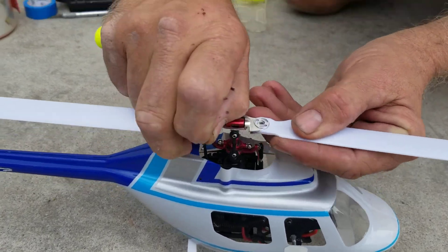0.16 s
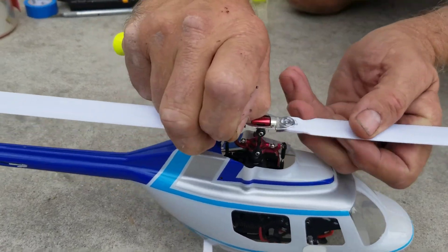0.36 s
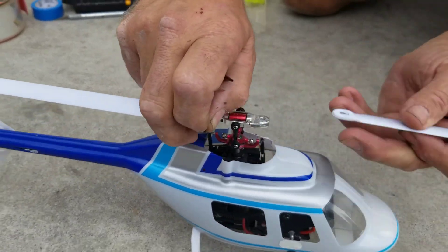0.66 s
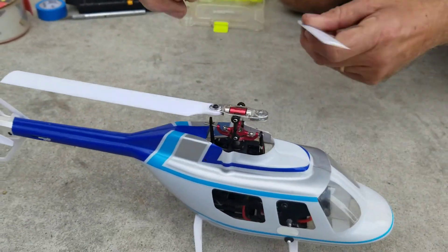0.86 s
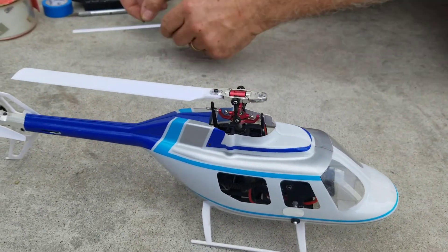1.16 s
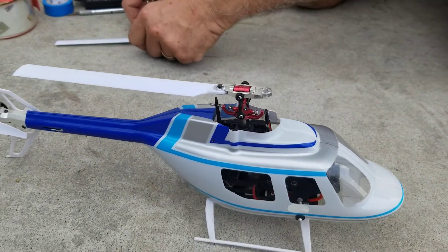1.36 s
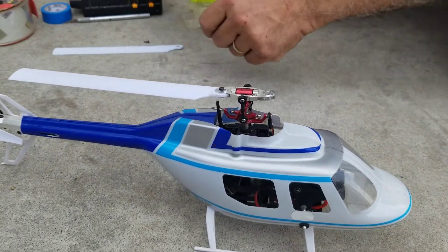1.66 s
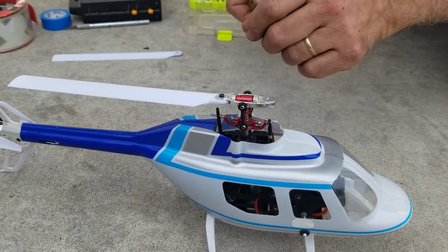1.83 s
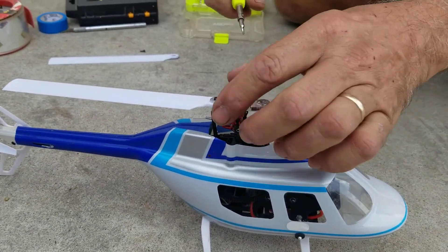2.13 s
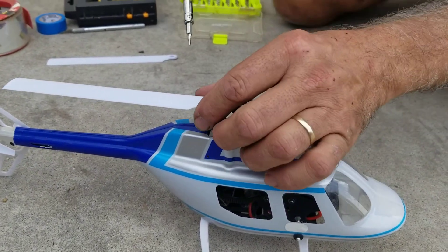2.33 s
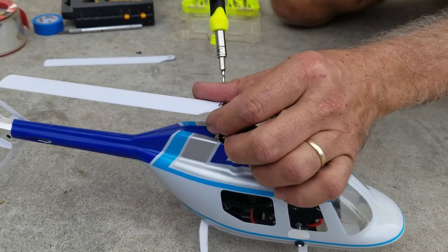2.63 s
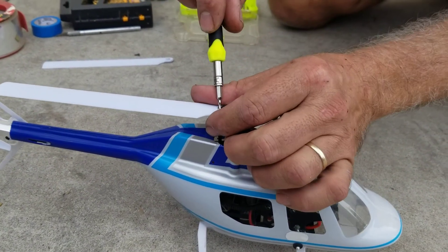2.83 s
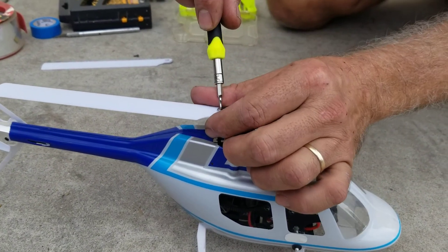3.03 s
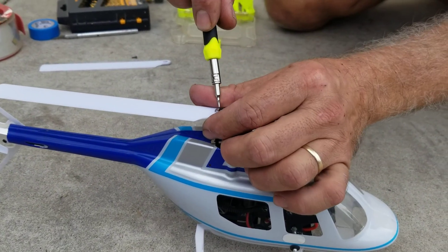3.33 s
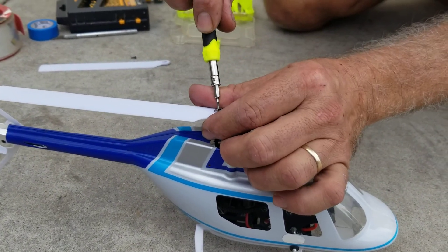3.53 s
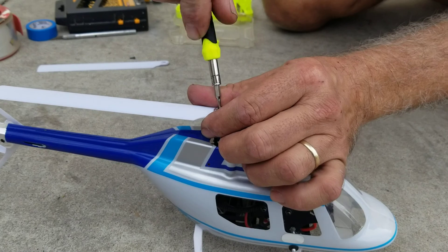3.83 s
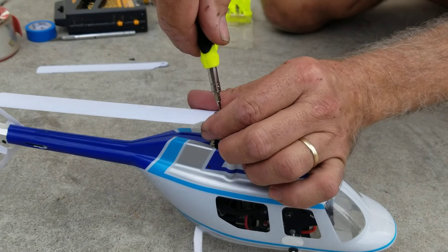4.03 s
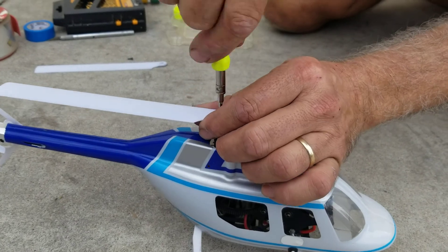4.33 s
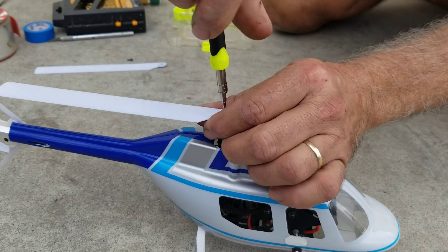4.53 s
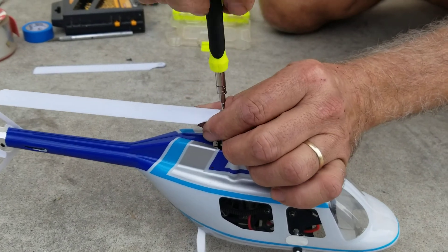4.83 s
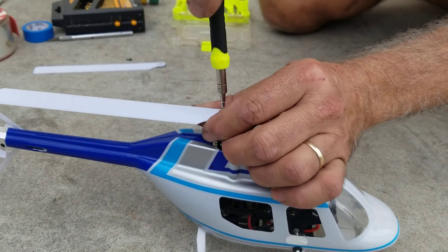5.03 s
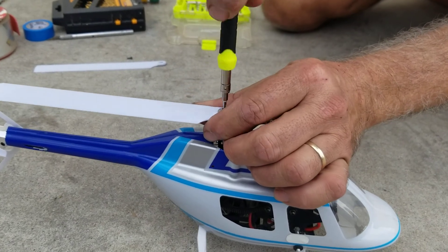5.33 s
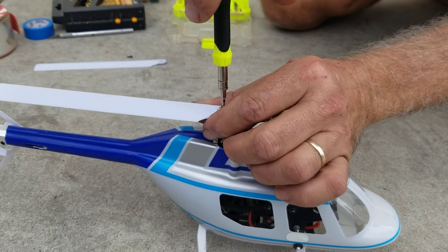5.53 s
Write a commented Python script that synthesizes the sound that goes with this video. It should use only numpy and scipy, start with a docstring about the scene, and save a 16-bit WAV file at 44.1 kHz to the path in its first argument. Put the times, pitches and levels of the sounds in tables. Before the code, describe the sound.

Close, light clicks, knocks and scrapes of a screwdriver and fingers on hollow plastic, with a low engine drone far off outdoors.

```python
"""Hands and a small screwdriver work on a plastic model helicopter, close to a phone's two microphone ports.
Ticks, knocks and scrapes ring the hollow cabin and shell, the metal hub and the screwdriver, and a short,
diffuse noisy tail follows each contact. Fingers creak and hiss on the plastic; a small metal part pings.
Far off, an engine drones and slows over outdoor rumble. A thin whistle comes and goes in the
background, and the microphone hisses steadily."""
import sys
import numpy as np
from scipy import signal
from scipy.fft import rfft, irfft
from scipy.io import wavfile
from scipy.ndimage import uniform_filter1d

SR = 44100
rng = np.random.default_rng(int(sys.argv[2]) if len(sys.argv) > 2 else 0)


def waveform_to_disk(signal):
    """Save audio, clipped to [-1, 1], as 16-bit WAV at the path in sys.argv[1]."""
    frames = np.transpose(np.atleast_2d(signal))
    scaled = np.clip(frames, -1, 1) * 32767
    samples = np.round(scaled).astype(np.int16)
    wavfile.write(sys.argv[1], SR, samples)


N = 250488

# microphone hiss, lifted by the resonance of its port: f/Hz, relative density/dB
HISS_SPECTRUM = [(1530, -47.5), (2600, -37.5), (5880, -32.5), (6390, -16), (7150, -27.5), (9380, -25),
                 (11000, -7), (11900, 2.5), (15800, -10)]
# outdoor background: f/Hz, relative density/dB
OUTDOOR_SPECTRUM = [(15, -72.5), (25, -26), (70, -12.5), (85, -13.5), (107, -9.5), (125, -11), (141, -20.5),
                    (220, -18.5), (435, -37.5), (461, -39), (680, -36), (1270, -51), (1540, -46.5),
                    (2600, -77.5), (3380, -112), (5720, -120)]
# its loudness: t/s, level/dB
OUTDOOR_LEVEL = [(0, -35), (1, -39.5), (2, -41.5), (3, -41), (4, -41), (5, -42.5), (5.68, -46)]
# far engine's fundamental: t/s, level/dB
ENGINE_LEVEL = [(0, -38.5), (.24, -25.5), (.75, -27.5), (1.35, -32), (1.72, -39.5), (2.12, -39.5),
                (2.4, -31), (2.75, -28.5), (3.2, -31.5), (3.37, -33), (3.5, -48.5), (3.76, -36),
                (4.2, -38.5), (4.55, -44), (5.43, -43.5), (5.58, -39), (5.68, -45)]
# its running: t/s, firing rate/Hz, flutter/dB
ENGINE_SPEED = [(0, 110, 1.2), (.15, 107.5, .8), (3.05, 107.5, .8), (3.3, 103, 1.8), (3.5, 90, 2.5),
                (4.4, 89, 3.5), (5.68, 89, 3.5)]
# thin whistle: t/s, level/dB
WHISTLE_LEVEL = [(0, -99), (2.12, -97.5), (2.2, -82), (2.3, -77), (2.58, -85), (2.68, -75), (2.95, -79),
                 (3.05, -104.5), (5.68, -99)]
# modes of the model and of the screwdriver's shaft and tip: f/Hz, width/Hz, relative level/dB
CABIN_MODES = [(456, 178, -5.5), (691, 120, 2), (945, 123, 1.5), (1174, 215, -2)]
SHELL_MODES = [(1603, 310, -1.5), (1831, 305, 0.5), (2041, 326, -1.5), (2274, 273, -5)]
HUB_MODES = [(2960, 610, -2), (3610, 900, 1), (4290, 840, 2), (4773, 850, 0.5), (5660, 900, -8)]
SHAFT_MODES = [(6660, 1070, -4.5), (7910, 640, 1.5), (8730, 800, 1), (9860, 570, 1.6)]
TIP_MODES = [(12380, 2350, 0.5), (13300, 1300, -9), (14260, 790, -3), (14300, 2400, -1)]
# fingers on the model: t/s, pressing creak/dB, sliding hiss/dB
FINGER_LEVELS = [(0, -56, -61.5), (.09, -58, -56), (.22, -65, -79), (.44, -59, -62), (.6, -61, -53),
                 (.76, -61, -63), (.88, -69.5, -67.5), (1.4, -67, -83), (1.8, -83, -77.5), (2.09, -75, -66),
                 (2.27, -67.5, -78.5), (2.42, -61.5, -68), (2.64, -71.5, -78.5), (3.11, -73, -78.5),
                 (3.45, -71, -99), (3.75, -62, -77), (4.4, -60.5, -73), (4.9, -65, -67.5), (5.27, -64, -71),
                 (5.4, -65.5, -74), (5.6, -65, -66.5)]
# soft scrapes, rms over 10 ms: t/s, body/dB, hub/dB, screwdriver/dB, tip over shaft/dB
SCRAPES = [(0.049, -59, -63, -60, 10.0), (0.229, -45.5, -48.5, -57, -2), (0.254, -51, -52.5, -58, -3),
           (0.355, -51, -58.5, -68.8, -0.9), (0.392, -50.5, -54.5, -65.0, -3.8),
           (0.445, -50, -59, -63.5, -14.0), (0.475, -68, -72, -65, -8), (0.522, -49, -51.5, -50, 2),
           (0.565, -69, -62, -65, 1.5), (0.595, -55, -61, -66, -0.7), (0.635, -49, -52.5, -63.4, -0.5),
           (0.665, -60, -63, -54.3, 4), (0.691, -44.5, -51.5, -61.5, -1.8), (0.755, -63, -71.7, -69.8, 5.7),
           (1.861, -67.5, -81.7, -66, 4.2), (1.904, -63, -61.5, -68.4, -5.1), (1.985, -70, -80.6, -64, 1.7),
           (2.02, -65, -71, -59, 1.3), (2.094, -72, -78, -65, -1.3), (2.318, -49.5, -59, -66, -7.1),
           (2.338, -45.5, -54, -65, -9), (2.415, -49.6, -59.2, -78, -2.0), (2.526, -55.3, -62.5, -75.1, -7),
           (3.088, -66, -69.0, -75.9, 0.2), (4.191, -45, -55.5, -64.7, 1), (4.22, -47, -53.5, -59.5, -3.3),
           (4.351, -62, -63, -60.5, 7), (4.544, -54, -60.2, -66.6, -6), (4.661, -70, -64, -53.5, 11),
           (4.815, -70, -82, -67, -11), (4.861, -78, -79, -59.5, 0.2), (4.907, -55, -58.5, -59.5, -0.3),
           (5.055, -52, -53, -68.4, -6.8), (5.095, -59.5, -74.3, -60.5, -2), (5.165, -66.5, -80, -66, 0.5),
           (5.269, -66, -66.8, -69, -2.9), (5.563, -75, -60.6, -66.7, 4.8)]
# sharp ticks and knocks, rms over 10 ms:
# t/s, cabin/dB, shell/dB, hub/dB, screwdriver/dB, tip over shaft/dB, left over right/dB
TICKS = [(0.031, -45, -47.5, -62, -74.7, 0.0, -8.0), (0.102, -31.5, -32.5, -39.5, -53.5, -3.5, -0.4),
         (0.172, -45.0, -50, -59.1, -78, -8.4, 1.0), (0.18, -46, -51, -46.5, -60, -2.3, -0.6),
         (0.201, -51, -45.5, -49.5, -51.5, 3, -4), (0.549, -48.5, -46.5, -51, -56, -2, -2),
         (1.007, -47, -56, -59.8, -65, -3.5, -2), (1.265, -62, -46.5, -46.5, -43, 1, -2),
         (1.293, -72, -54, -51, -51, -1, -1.1), (1.385, -49.5, -54.5, -48.0, -60, -4.1, 11),
         (1.402, -60, -51, -39.5, -36.5, -4.5, 1), (1.697, -67, -68, -64.1, -71.1, -1.8, -6.0),
         (1.722, -66, -71, -64, -72, -13.1, -2.8), (1.767, -71, -63.6, -54.5, -62.5, -6, -3.5),
         (1.89, -64, -61, -57, -59, -4, -3.1), (2.049, -62, -64, -59.0, -57, -7.8, -1.4),
         (2.073, -62, -57, -55.5, -56, -8, -4), (2.28, -60.0, -66, -61, -69, -6.0, -3),
         (2.291, -67.8, -57, -55.5, -67.5, -9, -2.5), (2.379, -58, -52.5, -57, -72, -7.3, -0.8),
         (2.45, -66.3, -57, -52, -63.5, -10, -1.4), (2.909, -57, -62.5, -69.5, -81, -0.8, -4.1),
         (2.999, -56, -64.5, -59, -52, -10.5, 0), (3.117, -57, -72, -72, -79, -8.6, -4),
         (3.485, -62, -65.1, -60.5, -64, -6.4, -3), (3.614, -64, -62.8, -68, -80.5, -6.7, -7),
         (3.636, -55, -57, -60.5, -69, -4.6, -1.8), (3.657, -53, -55, -61.6, -69, -2.6, -1.2),
         (3.677, -52, -58, -61, -75.3, -3.8, -1), (3.74, -69, -60, -67.4, -79.6, -7.5, -4.0),
         (3.81, -49.8, -54.5, -60, -66, 0, -4), (3.853, -51.0, -54, -63.3, -64, 5.1, -3),
         (3.881, -48.5, -57.8, -68, -68, -7.2, -2.5), (3.908, -38.5, -41.5, -36.5, -40, -1.5, -1.5),
         (4.059, -49.5, -56, -66, -52.5, 5, 0.7), (4.135, -65.8, -61, -74, -81.3, -1.7, -4.8),
         (4.245, -48, -50.5, -60, -68, -4.4, -1), (4.278, -52, -48, -56.5, -49, 2, 0.9),
         (4.592, -50, -50.5, -63.7, -63, -3.2, -4.2), (4.643, -58, -68, -78.4, -74.0, 10.0, -2),
         (4.721, -52.2, -56, -50, -44.7, 0.3, 0.1), (5.036, -48.5, -51.6, -44.8, -49, 5, -1),
         (5.045, -51, -50, -49, -45, 0, -2), (5.137, -69.8, -58, -61, -64, -2.4, -0.8),
         (5.153, -64.8, -59.1, -53.5, -62.9, -2, -3), (5.219, -58, -70, -61.5, -54, 2, 0.5),
         (5.325, -53.5, -54, -55.5, -45, 6, 1), (5.349, -70.3, -62.2, -58, -64, 5.9, -1.4),
         (5.378, -52.5, -48.5, -44.5, -40.2, -1.5, 0), (5.437, -70.7, -73, -56.4, -61.8, -7, 0),
         (5.538, -72.1, -73, -62.5, -54.5, -1.9, -1.4), (5.606, -61, -65, -54, -62.8, -14.0, -5),
         (5.626, -62, -55, -55.5, -51, -1.1, -1), (5.639, -52.5, -51.5, -54, -57.7, -2.9, 1),
         (5.669, -65, -58, -56, -61.2, -3.7, -1.4)]
TAIL_SEND_DB = [4.5, 5, 3, -2.5, 1.5]  # into the short tail: cabin, shell, hub, shaft, tip
SIDE = np.array([[1], [-1]])  # added at the left port, subtracted at the right

TAIL_T60_S, PORT_LAG_S = .12, .00007
FIRST_BLOW_DB, TOUCH_SPREAD_DB = 14, 1.8  # first impact over its rattle; scatter of mode levels


def undb(db):
    """Gain of a level in dB."""
    return 10 ** (np.asarray(db) / 20)


def level(x, db):
    """Scale to an rms level."""
    return x * undb(db) / np.sqrt(np.mean(x ** 2))


def curves(table):
    """Columns of a timed table, one value a sample."""
    times, *columns = np.transpose(table)
    return [np.interp(np.arange(N) / SR, times, column) for column in columns]


def walk(rate):
    """Random levels held 1 / rate s and smoothed twice; spread near 1."""
    hold = int(SR / rate)
    steps = np.repeat(rng.standard_normal(N // hold + 1), hold)
    return 1.354 * uniform_filter1d(uniform_filter1d(steps, hold), hold)[:N]


def noise_spectrum(points):
    """Spectra of two unrelated noises shaped by points of f/Hz, level/dB."""
    hz, db = np.transpose(points)
    gain = undb(np.interp(np.log(np.fft.rfftfreq(N, 1 / SR) + 1e-9), np.log(hz), db))
    return rfft(rng.standard_normal((2, N))) * gain


def response(modes, size, touch_db=0):
    """Spectrum of a sum of resonances of alternating sign, with mean power 1."""
    centre, width, db = np.transpose(modes)[:, :, None]
    hz = np.fft.rfftfreq(size, 1 / SR)
    sign = (-1.) ** np.arange(len(modes))[:, None]
    peaks = 1j * hz * width / (centre ** 2 - hz ** 2 + 1j * hz * width)
    gain = np.sum(sign * undb(db + touch_db) * peaks, axis=0)
    return gain / np.sqrt(np.mean(abs(gain) ** 2))


def ring(x, modes):
    """Pass a signal through resonances."""
    return irfft(rfft(x) * response(modes, N), N)


def microphone_hiss(top_hz=15800, db=-71.5):
    """The microphone's own noise, steady and unrelated at the two ports."""
    below = np.fft.rfftfreq(N, 1 / SR) < top_hz
    return level(irfft(noise_spectrum(HISS_SPECTRUM) * below, N), db)


def rumble(hz=48.4, width_hz=16, db=-57):
    """The deepest bass of the place, steady and nearly alike at both ports."""
    mid, side = ring(rng.standard_normal((2, N)), [(hz, width_hz, 0)])
    return level(mid + .2 * side * SIDE, db)


def outdoors():
    """Open air: octave noise bands that swell together and flicker alone, wider towards the treble."""
    out, swell = 0, walk(0.55)
    hz = np.fft.rfftfreq(N, 1 / SR) + 1e-9
    for centre in 50 * 2. ** np.arange(7):
        band = np.cos(np.pi / 2 * np.clip(np.log2(hz / centre), -1, 1))
        mid, side = irfft(noise_spectrum(OUTDOOR_SPECTRUM) * band, N)
        apart = np.clip((centre / 2500) ** 0.39, .2, 1)
        out = out + undb(0.25 * swell + 0.3 * walk(4.5)) * (mid + apart * side * SIDE)
    return level(out, curves(OUTDOOR_LEVEL)[0])


def far_engine(fade_db_per_s=5, slowing_db_per_hz=.35):
    """Three harmonics of a slightly uneven firing rate; the air on the way makes the level flutter."""
    hz, flutter_db = curves(ENGINE_SPEED)
    wobble = 0.0041 * flutter_db ** 1.585 * walk(20)
    phase = 2 * np.pi * np.cumsum(hz * (1 + wobble)) / SR
    # the overtones fade as the engine draws away and as it slows
    second_db = -40 - fade_db_per_s * np.arange(N) / SR - slowing_db_per_hz * np.maximum(105 - hz, 0)
    harmonics_db = curves(ENGINE_LEVEL)[0], second_db, second_db - 12
    return sum(np.sqrt(2) * undb(db + flutter_db * walk(18)) * np.sin(k * phase)
               for k, db in enumerate(harmonics_db, 1))


def whistle(hz=4150, width_hz=260):
    """A faint, thin whistle: noise passed twice through one narrow resonance."""
    mode = [(hz, width_hz, 0)]
    narrow = ring(ring(rng.standard_normal((2, N)), mode), mode)
    return level(narrow, curves(WHISTLE_LEVEL)[0])


def ping(start_s=.549, hz=4200, db=-49, t60_s=.17):
    """A small metal part rings once, a lone mode dying away."""
    t = np.arange(N) / SR - start_s
    return (t > 0) * undb(db - 60 * np.maximum(t, 0) / t60_s) * np.sin(2 * np.pi * hz * t)


def skin_slips(scatter_db, patchy_db):
    """Dense uneven slips of skin on plastic, swelling together at the two ports."""
    mid, side = rng.standard_normal((2, N))
    strength = undb(scatter_db * rng.standard_normal(N) + patchy_db * walk(90))
    return level(strength * (mid + 0.98 * side * SIDE), 0)


def fingers(slide_share=0.69, cabin_apart=.6):
    """Close up, pressing makes the body creak, sliding skin hisses, and the hub rasps with both."""
    creak_db, skin_db = curves(FINGER_LEVELS)
    rasp_db = creak_db + slide_share * (skin_db - creak_db) - 1
    creak = skin_slips(scatter_db=3.8, patchy_db=2.7)
    mid = creak.mean(axis=0)
    low_creak = mid + cabin_apart * (creak - mid)  # differs less between the ports
    body = ring(creak, SHELL_MODES) + undb(5) * ring(low_creak, CABIN_MODES)
    slide = skin_slips(scatter_db=4.5, patchy_db=2.34)
    skin = ring(slide, SHAFT_MODES) + undb(2) * ring(slide, TIP_MODES)
    return undb(creak_db) * body + undb(rasp_db) * ring(creak, HUB_MODES) + undb(skin_db) * skin


def short_tail(envelope, noise):
    """Spectrum of a short, diffuse tail: noise whose power follows the contact, then dies away."""
    decay = undb(-120 / TAIL_T60_S / SR)  # of power, each sample
    power = signal.lfilter([.02], [1, -decay], envelope ** 2)
    return rfft(noise * np.sqrt(power))


def contacts(table, decay_ms, tail_send_db, swell, apart):
    """Each contact is a run of tiny impacts that rings model and screwdriver; a noisy tail follows."""
    size, samples_10ms = 8192, SR / 100
    out = np.zeros((2, N + size))
    t, hz = np.arange(size) / SR, np.fft.rfftfreq(size, 1 / SR)
    age = 1000 * t / decay_ms
    envelope = np.exp(-age ** 1.14) * np.minimum(t / .0006, 1) * (age if swell else 1)
    envelope /= np.sqrt(np.sum(envelope ** 2) / samples_10ms)
    for start_s, cabin_db, shell_db, hub_db, driver_db, tip_db, pan_db in table:
        mid, side, scatter, touch, *diffuse = rng.standard_normal((6, size))
        if not swell:
            mid[np.argmax(envelope)] = undb(FIRST_BLOW_DB)
        mid_spectrum, side_spectrum = rfft(envelope * undb(4.1 * scatter) * np.array([mid, side]))
        # high notes differ more between the ports than low ones
        rattle = mid_spectrum + apart * np.minimum(hz / 1500, 1) * side_spectrum * SIDE
        # the two ports hear the spot from slightly different distances
        lag_s = PORT_LAG_S * (1 + 0.67 * touch[-1]) * np.array([[0], [1]])
        rattle *= np.exp(-2j * np.pi * hz * lag_s)
        tail, total = short_tail(envelope, diffuse), 0
        parts_db = cabin_db, shell_db, hub_db, driver_db - tip_db / 2, driver_db + tip_db / 2
        for k, modes in enumerate((CABIN_MODES, SHELL_MODES, HUB_MODES, SHAFT_MODES, TIP_MODES)):
            # every touch point drives the modes in other proportions
            part = response(modes, size, TOUCH_SPREAD_DB * touch[8 * k:8 * k + len(modes), None])
            strike = rattle * np.sqrt(samples_10ms / np.mean(abs(part * mid_spectrum) ** 2))
            part_tail = undb(tail_send_db + TAIL_SEND_DB[k]) * tail
            total = total + undb(parts_db[k]) * part * (strike + part_tail)
        start = int(start_s * SR)
        out[:, start:start + size] += undb(SIDE * pan_db / 2) * irfft(total, size)
    return out[:, :N]


def scrapes(cabin_over_shell_db=1.5, pan_db=-1.5):
    """Soft, swelling contacts that move cabin and shell together, just right of centre."""
    tilt_db = cabin_over_shell_db / 2
    rows = [(start_s, body_db + tilt_db, body_db - tilt_db, *metal_db, pan_db)
            for start_s, body_db, *metal_db in SCRAPES]
    return contacts(rows, decay_ms=11.1, tail_send_db=-12.5, swell=True, apart=0.71)


def ticks():
    """Sharp ticks and knocks close to the microphone: one hard blow, then a brief rattle."""
    return contacts(TICKS, decay_ms=3.1, tail_send_db=-16.5, swell=False, apart=0.59)


def scene():
    """Work on the model up close, the engine and the open air behind it."""
    near = ticks() + scrapes() + fingers() + ping()
    return near + whistle() + far_engine() + outdoors() + microphone_hiss() + rumble()


def record(dry):
    """The phone cuts off steeply above 16.7 kHz."""
    return signal.sosfilt(signal.ellip(10, .2, 70, 16700, fs=SR, output="sos"), dry)


dry = scene()
out = record(dry)
waveform_to_disk(out)
```